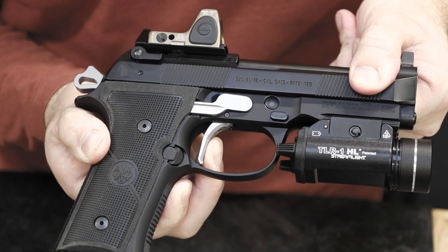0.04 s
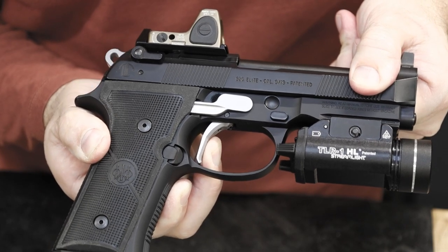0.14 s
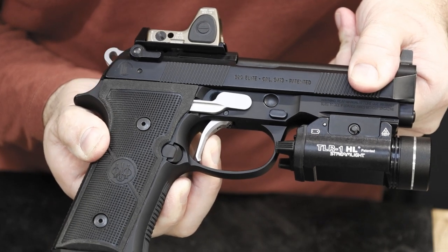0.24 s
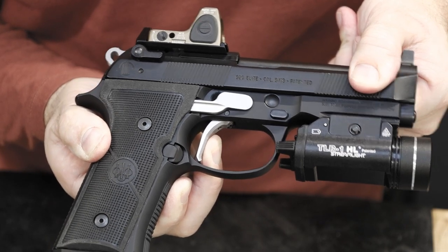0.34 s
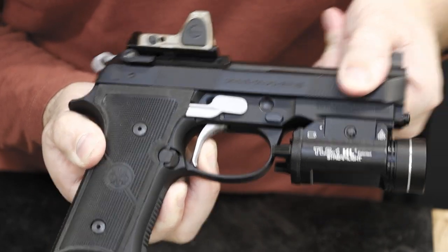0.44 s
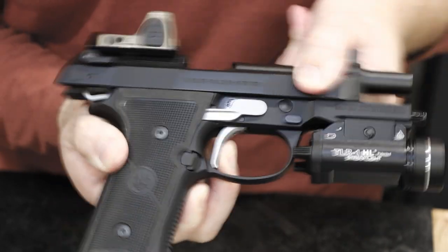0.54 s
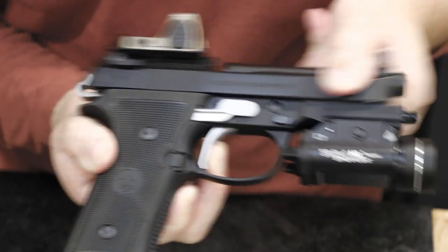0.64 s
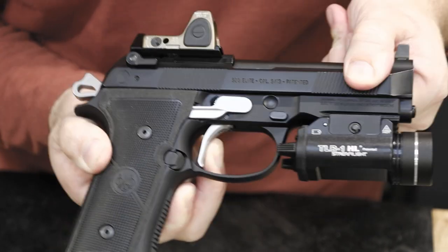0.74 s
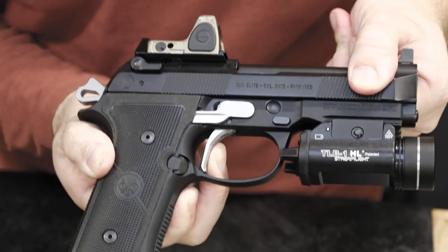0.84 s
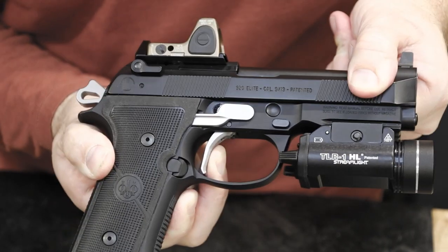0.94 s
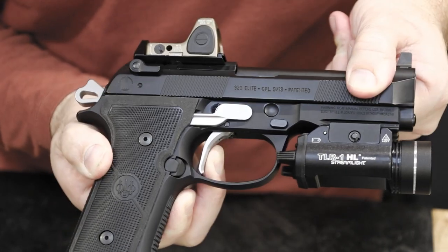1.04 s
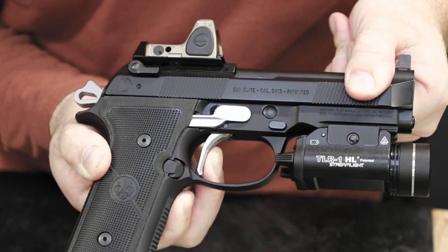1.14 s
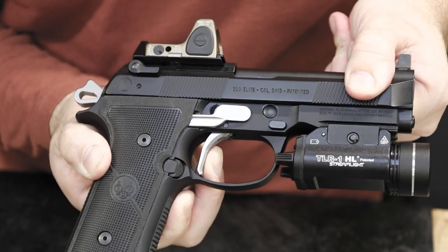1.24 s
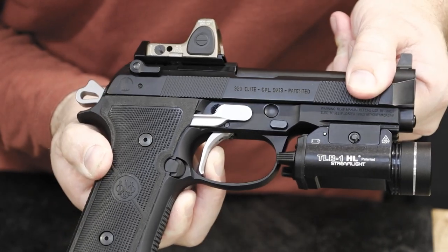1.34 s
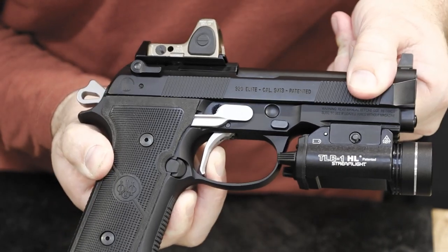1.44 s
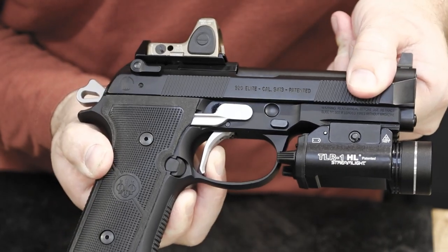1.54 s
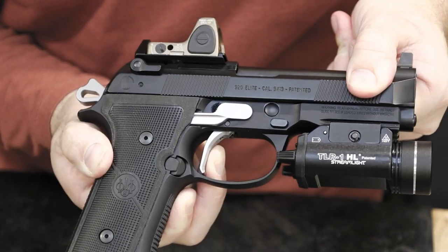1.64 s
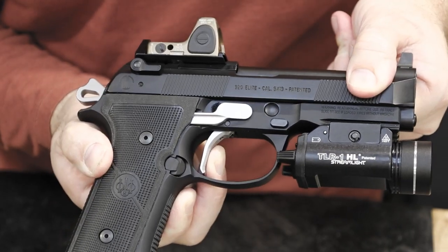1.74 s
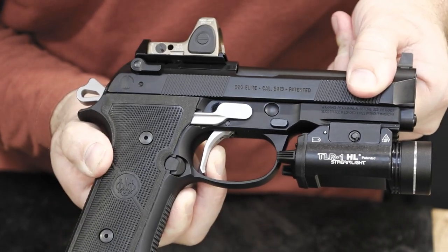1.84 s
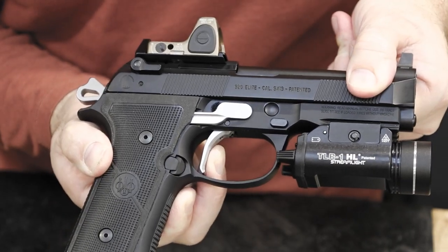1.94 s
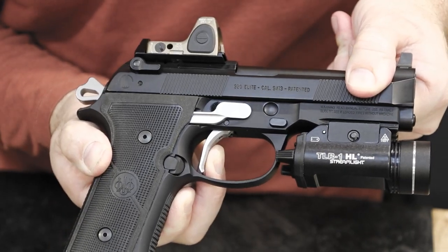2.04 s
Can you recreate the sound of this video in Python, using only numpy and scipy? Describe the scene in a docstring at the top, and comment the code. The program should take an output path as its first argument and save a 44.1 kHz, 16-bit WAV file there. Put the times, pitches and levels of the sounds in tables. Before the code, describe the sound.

A handgun dry-fires with a loud bright snap, then its mechanism clicks and clacks over faint hum

```python
"""Dry-fired pistol in a hard room

An unloaded pistol is dry-fired and worked by hand close by: a sharp snap, a run of clicks, a last cocking clack.
Steel contacts and lockwork knocks are short coloured noise bursts; the parts that ring are decaying sines.
A hard-walled room answers with a diffuse tail, over ventilation made of soft noise and wavering hum tones.
The recorder's limiter ducks at the loud clicks and recovers; the first peaks that slip through clip."""
import sys
import numpy as np
from scipy import signal
from scipy.fft import irfft
from scipy.io import wavfile
from scipy.ndimage import uniform_filter1d, map_coordinates

SR = 44100
rng = np.random.default_rng(int(sys.argv[2]) if len(sys.argv) > 2 else 0)


def wav_record(signal):
    """Record a signal, one row per channel, as 16-bit PCM in the file named by sys.argv[1]."""
    frames = np.transpose(np.atleast_2d(signal))
    bounded = np.clip(frames, -1, 1)
    # unit amplitude maps onto the largest positive 16-bit level
    quanta = np.round(bounded * 32767).astype(np.int16)
    wavfile.write(sys.argv[1], SR, quanta)


N = 92610  # 2.1 s

# Sharp steel contacts: [t/s, level/dB, treble tilt/(dB per octave), t60/s, send to the room/dB]
STEEL_CLICKS = [(0.1973, -24, 5, .02, 0.5), (0.2, -9.5, 6, 0.016, 0), (0.2027, -3, 9, 0.014, 0.5),
                (0.2068, 12, 2.5, 0.014, 2), (0.5414, -27, -5.5, .025, 2), (0.5609, -22.5, 2.5, 0.022, 0.5),
                (0.5657, -13, -3.5, 0.0068, 0), (0.5738, 5, -1.5, 0.012, -2.5),
                (0.5871, -4.5, -1, 0.012, -1), (0.5997, -18.5, 2.5, .018, 0), (.6164, -3.5, -1.5, .014, 0),
                (.727, -25.5, -4, .04, 0.5), (0.73, -21, -4, .025, 0), (.7438, -21.5, 0, .02, 0),
                (0.7472, -14.5, -1, 0.014, 0), (.7568, 12.5, -4, 0.0088, -3), (0.7608, 5.5, 3, 0.0065, -4),
                (0.764, -1.5, -1, 0.03, -2.5)]
# Dull knocks of the lockwork inside the frame: [t/s, level/dB, t60/s]
LOCKWORK_KNOCKS = [(0.1986, -17.5, .04), (.2045, -13.5, .02), (0.5533, -27, 0.0822), (0.5636, -16.5, .025),
                   (0.573, -16.5, .03), (.5745, -7, .025), (0.5859, -14, .025), (.7235, -27, 0.078),
                   (0.734, -22.5, .035), (0.7377, -19.5, .03), (0.7441, -10, .03), (.747, -9, .022)]
# Spectrum of the bare steel clicks: [f/Hz, level/dB]
STEEL_COLOUR = [(60, -30.5), (250, -23.5), (500, -16.5), (850, -22), (1300, -6.5), (2400, -4.5),
                (3500, 1.5), (5000, -1), (7500, 1), (10000, -1), (12000, -6.5), (15500, -10.5)]
# Spectrum of the knocks inside the frame: [f/Hz, level/dB]
LOCKWORK_COLOUR = [(100, -31), (700, -24.5), (1200, -3), (1900, 0.5), (2600, -2), (3600, -2), (5000, -16),
                   (14000, -32)]
# Modes of the ringing slide, frame, hammer and trigger: [f/Hz, level/dB, t60/s]
SLIDE_MODES = [(1510, -11, 0.038), (2000, -13, .04), (3230, -10.5, .05), (3585, -5.5, 0.05),
               (4600, -13, 0.063), (5950, -9, .04), (7570, -1.5, 0.01597), (9260, -1.5, .012),
               (12320, -4, .02)]
FRAME_MODES = [(1100, -9, .02), (1780, -14.5, .014), (1910, -1.5, 0.021)]
HAMMER_MODES = [(1420, -14, .03), (2256, -14, .07), (3311, -8, .06), (3620, -8, .06), (3833, -5, .028),
                (4310, -4, .055), (5448, -4, .024), (5975, -10, .07), (7090, -5, .03), (8172, -5, .03),
                (8387, -3, .022), (9100, -8, .04), (10010, -6, .03), (13180, -8, .07)]
TRIGGER_MODES = [(1170, -5.5, .022), (1334, -2.5, .022), (1455, -5, .022)]
# Blows that set each part ringing: [t/s, level/dB]
SLIDE_HITS = [(0.2066, 3.5)]
FRAME_HITS = [(0.199, -9.5), (0.2027, -7)]
HAMMER_HITS = [(.5742, -17.5), (.757, -2)]
TRIGGER_HITS = [(0.617, -6.5)]
# Reverberation time of the room: [f/Hz, t60/s]
WALL_T60 = [(200, .5), (1500, 0.61), (4000, 0.66), (7000, 0.54), (10000, .43), (15000, .33)]
# Spectral balance of the room tail: [f/Hz, level/dB]
WALL_COLOUR = [(100, -21.5), (800, -6), (1150, -6), (1450, -2), (1750, 0.5), (2100, 2.5), (2700, -1.5),
               (3450, -1.5), (4200, -1.5), (5300, 0), (6000, 0), (6700, -5), (9000, -6), (15000, -9)]
# Spectrum of the ventilation air: [f/Hz, level/dB]
AIR_COLOUR = [(25, -25.5), (55, -17.5), (90, -25), (160, -19.5), (280, -7.5), (350, -15), (460, -13.5),
              (620, -20.5), (760, -16.5), (1050, -22.5), (2000, -29.5), (3400, -34.5), (5000, -42.5),
              (7500, -47), (15500, -50)]
# Ventilation hum tones: [f/Hz, level/dB, wander rate/Hz]
HUM_TONES = [(119, -59, 4.7), (200, -59, 25), (229.7, -64, 15), (285.5, -51.5, 14), (467.7, -61.5, 23)]

RISE_S = 0.00035  # time constant of every onset
TILT_FROM_HZ = 5700
KNOCK_ROOM_DB = -6  # send from the knocks to the room
ROOM_DB, ROOM_RING_DB, ROOM_DELAY_S = -7, -7.5, 0.0052
AIR_DB = -46.5
LIMIT_DB, LIMIT_ATTACK_S, RELEASE_DB_PER_S, SENSE_S = -6.5, 0.002, 93.5, 0.0014
CLIP_DB = -1.5
LOW_CUT_HZ, TOP_HZ = 35, 16000


def contacts():
    """Each contact stirs dense, quickly damped resonances; returns the close sound and the room send."""
    near, outward = np.zeros((2, N))
    hits = [(STEEL_COLOUR, *click) for click in STEEL_CLICKS]
    for s, db, t60 in LOCKWORK_KNOCKS:
        hits.append((LOCKWORK_COLOUR, s, db, 0, t60, KNOCK_ROOM_DB))
    for colour, s, db, tilt_db, t60, room_db in hits:
        envelope = fade(t60)
        burst = amp(db) * envelope * noise(colour, tilt_db, size=len(envelope))
        add(near, s, burst)
        add(outward, s, amp(room_db) * burst)
    return near, outward


def ringing(modes, blows):
    """The hardest blows ring a part's modes as sines, each dying away as the hand damps it."""
    out = np.zeros(N)
    for s, blow_db in blows:
        for hz, db, t60 in modes:
            envelope = fade(t60)
            cycles = hz * np.arange(len(envelope)) / SR + rng.random()
            add(out, s, amp(blow_db + db) * envelope * np.sin(2 * np.pi * cycles))
    return out


def room(x, count):
    """A diffuse tail: walls store energy spread over count frequency bins and lose it at each band's rate."""
    size = 512
    delayed = np.pad(x, (round(ROOM_DELAY_S * SR), 0))[:N]
    hz, t, spectrum = signal.stft(delayed, SR, nperseg=size)
    fed = uniform_filter1d(abs(spectrum) ** 2, count, axis=0)

    # Energy falls twice as fast in the exponent as amplitude.
    decay = np.exp(-2 * np.log(1000) * t / along(WALL_T60, hz)[:, None])
    decay = decay / decay.sum(axis=1, keepdims=True)
    stored = abs(signal.fftconvolve(fed, decay, axes=1)[:, :len(t)])

    # Random noise carries the stored energy, so the tail has no distinct echoes.
    scatter = signal.stft(rng.standard_normal(N), nperseg=size)[2]
    colour = amp(along(WALL_COLOUR, hz))[:, None]
    tail = scatter / scatter.std() * np.sqrt(stored) * colour
    return signal.istft(tail, nperseg=size)[1][:N]


def ventilation():
    """Soft air noise with hum tones whose level and phase wander as two random curves steer them."""
    t = np.arange(N) / SR
    out = amp(AIR_DB) * noise(AIR_COLOUR)
    for hz, db, wander_hz in HUM_TONES:
        knots = rng.standard_normal((2, 256))
        a, b = [map_coordinates(row, [t * wander_hz], mode="wrap") for row in knots]
        phase = 2 * np.pi * hz * t
        out += amp(db) * unit(a * np.sin(phase) + b * np.cos(phase))
    return out


def scene():
    """Mix the pistol, its room and the ventilation."""
    snaps, outward = contacts()
    parts = [(SLIDE_MODES, SLIDE_HITS), (FRAME_MODES, FRAME_HITS),
             (HAMMER_MODES, HAMMER_HITS), (TRIGGER_MODES, TRIGGER_HITS)]
    rings = sum(ringing(modes, blows) for modes, blows in parts)
    click_tail = amp(ROOM_DB) * room(outward, count=9)
    ring_tail = amp(ROOM_RING_DB) * room(rings, count=1)  # one bin wide: keeps the pitch
    return (snaps + rings + click_tail + ring_tail + ventilation())[None]


def record(dry):
    """A fast limiter with a slow release, rounded clipping of what slips through, and the band limits."""
    x = dry[0]
    power = smooth(x ** 2, SENSE_S)
    over_db = np.maximum(10 * np.log10(power + 1e-12) - LIMIT_DB, 0)

    # Hold each peak of gain reduction and let it fall at a steady rate.
    ramp_db = RELEASE_DB_PER_S * np.arange(N) / SR
    duck_db = np.maximum.accumulate(over_db + ramp_db) - ramp_db
    x = x * amp(-smooth(duck_db, LIMIT_ATTACK_S))

    x = x / (1 + (x / amp(CLIP_DB)) ** 6) ** (1 / 6)
    low_cut = signal.butter(1, LOW_CUT_HZ, "highpass", fs=SR, output="sos")
    top_cut = signal.ellip(10, 0.1, 80, TOP_HZ, fs=SR, output="sos")
    return signal.sosfilt(top_cut, signal.sosfilt(low_cut, x))[None]


def fade(t60):
    """A quarter second of quick rise and exponential decay."""
    t = np.arange(SR // 4) / SR
    return (1 - np.exp(-t / RISE_S)) * np.exp(-np.log(1000) * t / t60)


def noise(colour, tilt_db=0, size=N):
    """Random-phase coloured noise of rms 1, tilted by tilt_db per octave above TILT_FROM_HZ."""
    hz = np.fft.rfftfreq(size, 1 / SR)
    octaves_up = np.log2(np.maximum(hz / TILT_FROM_HZ, 1))
    gain = amp(along(colour, hz) + tilt_db * octaves_up)
    return unit(irfft(gain * np.exp(2j * np.pi * rng.random(len(hz))), size))


def add(track, s, sound):
    """Mix a sound in at time s."""
    part = track[round(s * SR):][:len(sound)]
    part += sound[:len(part)]


def along(points, hz):
    """Read (frequency, value) points on a log frequency axis."""
    f, v = np.transpose(points)
    return np.interp(np.log(hz + 1), np.log(f + 1), v)


def amp(db):
    """Decibels to gain."""
    return 10 ** (np.asarray(db) / 20)


def unit(x):
    """Scale to rms 1."""
    return x / np.sqrt(np.mean(x ** 2) + 1e-20)


def smooth(x, seconds):
    """One-pole lag."""
    k = np.exp(-1 / (seconds * SR))
    return signal.lfilter([1 - k], [1, -k], x)


dry = scene()
out = record(dry)
wav_record(out)
```